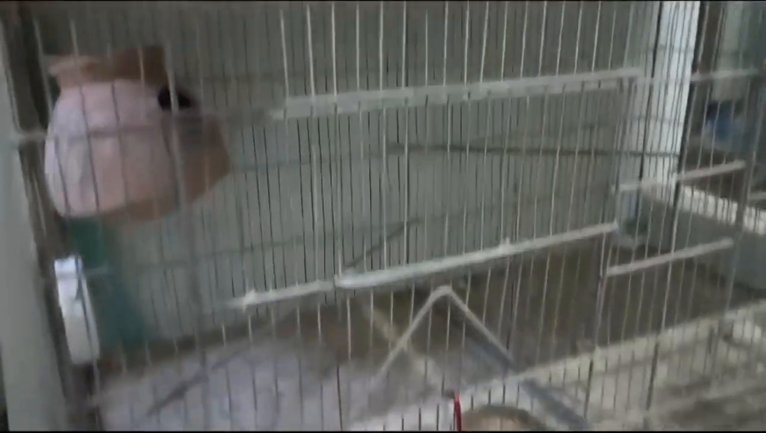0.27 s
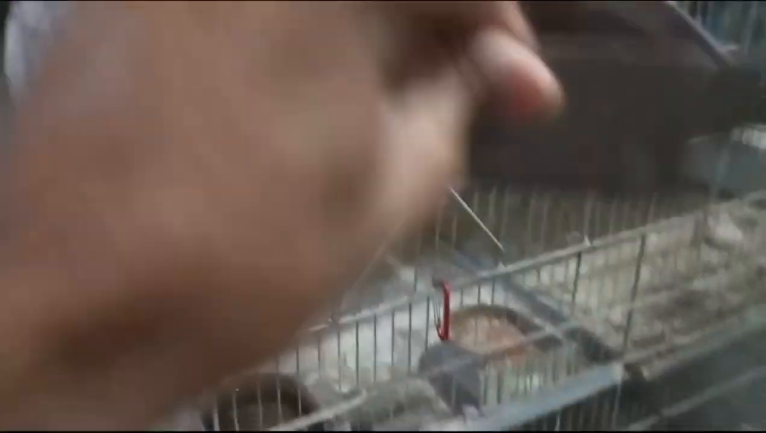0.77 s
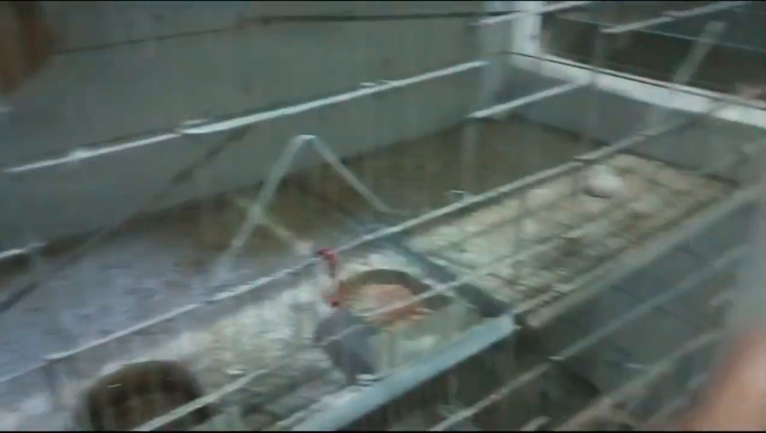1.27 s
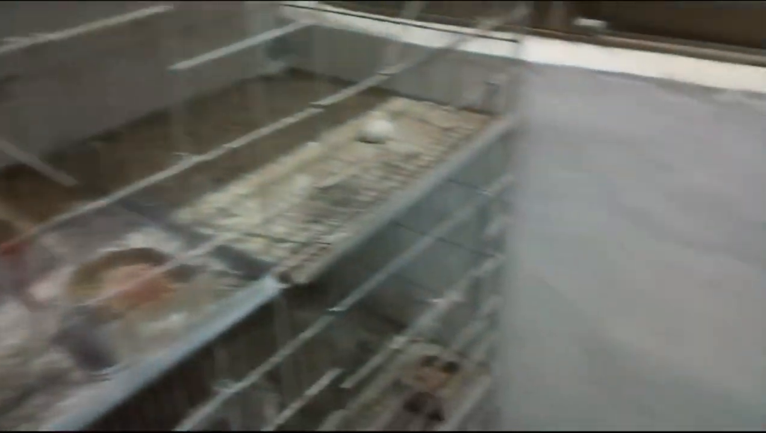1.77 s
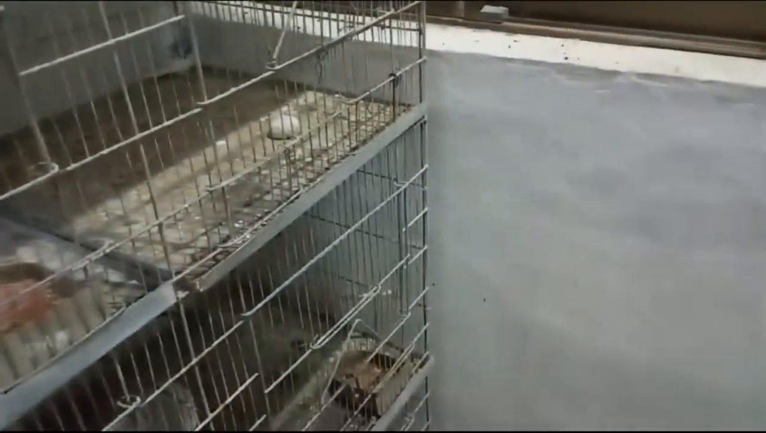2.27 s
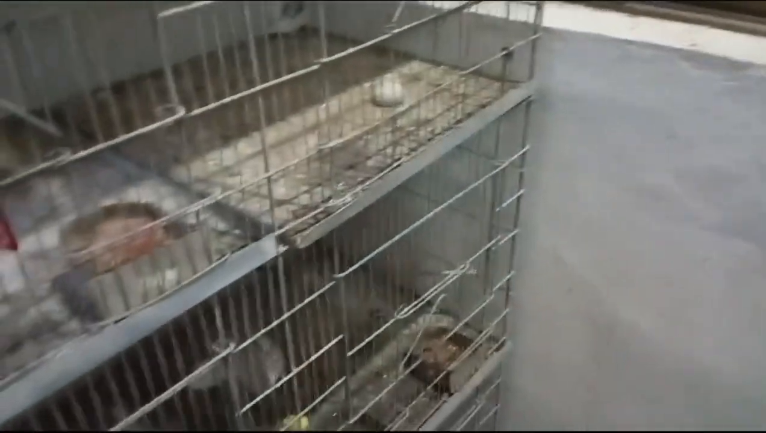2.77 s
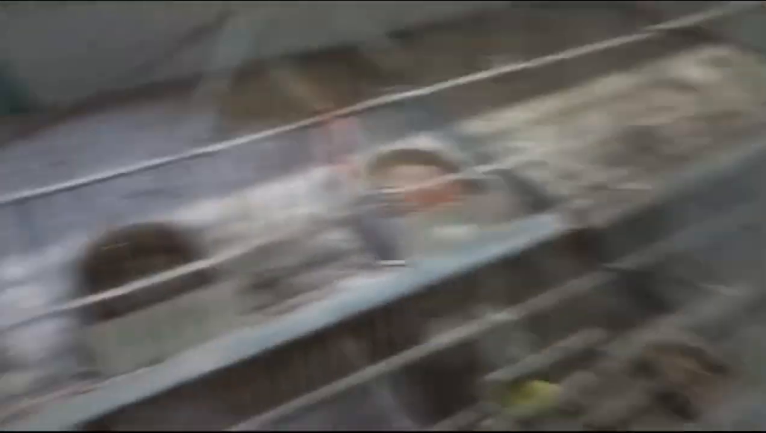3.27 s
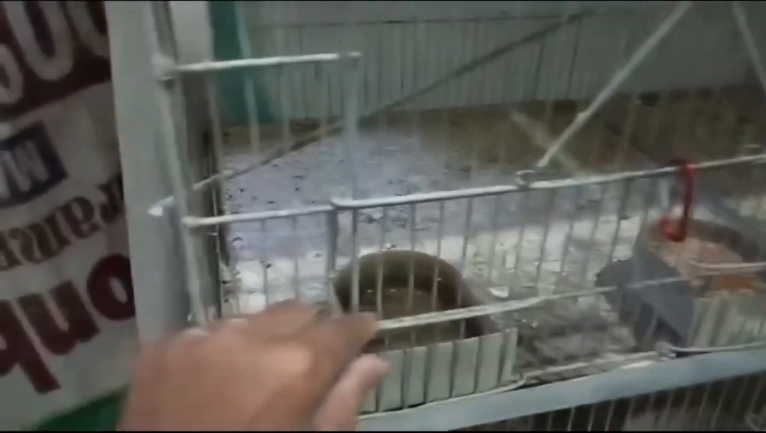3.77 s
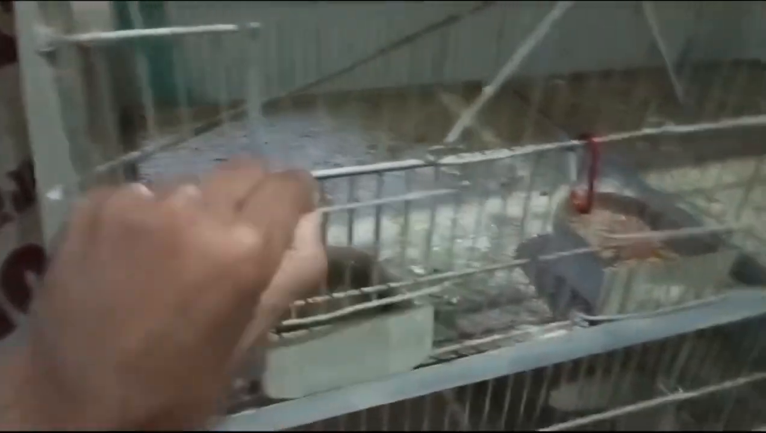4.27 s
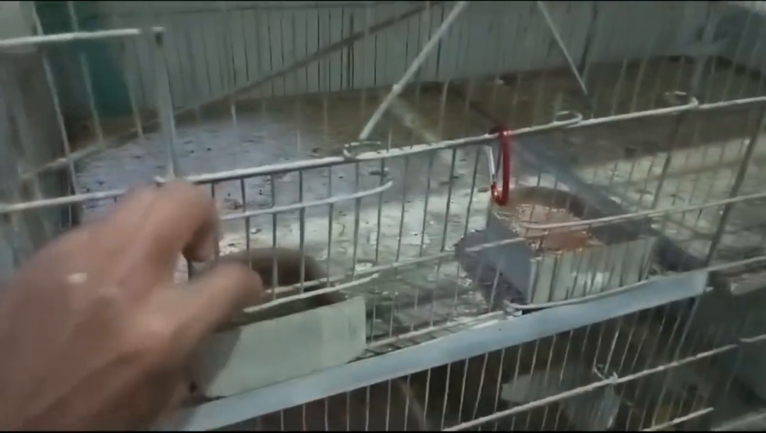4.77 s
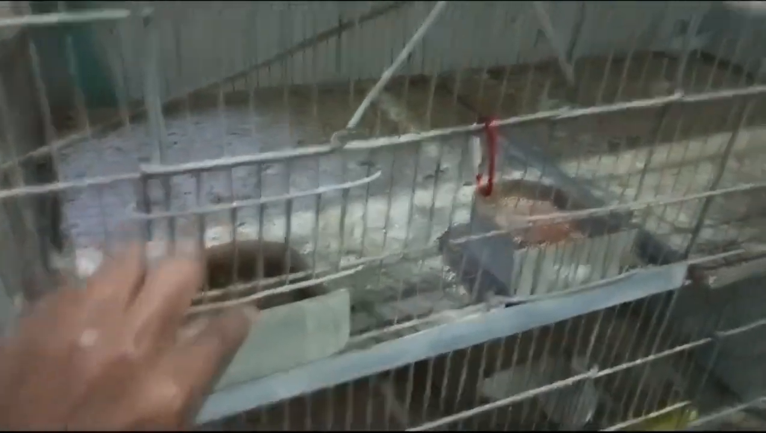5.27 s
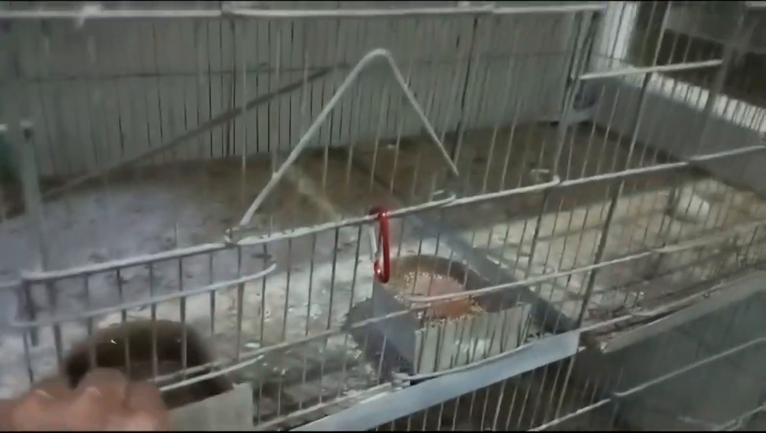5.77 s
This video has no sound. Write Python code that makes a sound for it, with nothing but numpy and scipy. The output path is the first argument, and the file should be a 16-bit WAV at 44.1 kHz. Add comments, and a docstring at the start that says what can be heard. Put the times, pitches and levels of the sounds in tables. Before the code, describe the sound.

Nasal finch calls and scratchy chirps indoors, with one loud squawk, short wing flurries and two rattling jolts of a wire cage.

```python
"""Small cage birds call in a hard-walled room: nasal finch notes, rasps, chirps and one loud, close squawk.
Each call is a harmonic source, the syrinx, shaped by a resonant filter, the throat. Wings whirr in
short flurries; twice the wire cage is jolted, so that impacts set its bars chattering and its tray booming.
Light ticks, a faint high hiss, a hand on the cage and low room noise lie underneath."""
import sys
import numpy as np
from scipy import signal
from scipy.fft import rfft, irfft, next_fast_len
from scipy.io import wavfile
from scipy.ndimage import map_coordinates

SR = 44100
rng = np.random.default_rng(int(sys.argv[2]) if len(sys.argv) > 2 else 0)


def to_wav(sig):
    """Store sig (one row per channel, or 1-D mono) as 16-bit WAV at the path in sys.argv[1].

    Samples outside -1..1 are clipped; the rate is SR.
    """
    pcm = np.clip(np.atleast_2d(sig), -1, 1) * 32767
    pcm = np.round(pcm).astype(np.int16)
    wavfile.write(sys.argv[1], SR, pcm.T)  # frames by channels


N = 264688
BAND_LIMIT_HZ = 15850

# spectrum of the room noise: (frequency [Hz], level [dB])
AIR_SPECTRUM = [(25, -13), (80, 5.5), (220, 0), (370, -2.5), (850, -11), (1600, 1.5), (2200, -7.5),
                (3200, -4.5), (4200, -16.5), (6000, -11), (7800, -24), (10200, -19.5), (16000, -44)]
# the hand shifts the cage: (start [s], duration [s], level [dB])
CAGE_SHIFTS = [(-.15, 0.52, -44.5), (.25, 0.88, -53.5), (3.37, 0.43, -46.5), (4.03, 1.04, -44)]
# spectrum of the handled cage: (frequency [Hz], level [dB])
RUMBLE_SPECTRUM = [(25, -27), (60, -20.5), (100, -5.5), (170, -6), (235, -2), (380, -9.5), (600, -11),
                   (1200, -13), (3000, -44)]
# swells of a faint, high hiss: (start [s], duration [s], level [dB])
HISS_SWELLS = [(-.15, 0.38, -50.5), (.31, 0.061, -41), (.4, 0.16, -34.5), (.72, 0.24, -56),
               (1.6, 0.3, -52.5), (2.57, .12, -55.5), (2.94, 0.064, -53.5), (3.68, 0.054, -56),
               (4, 0.028, -57), (4.5, 0.61, -61), (5.33, 0.068, -49.5), (5.66, 0.18, -46)]
# spectrum of that hiss: (frequency [Hz], level [dB])
HISS_SPECTRUM = [(2000, -32), (3300, -10), (6000, -11), (7800, -18.5), (10300, -2.5), (13000, -18.5),
                 (16000, -20)]
# flurries of wingbeats: (start [s], duration [s], level [dB], beat rate [Hz])
WING_FLURRIES = [(-.06, 0.19, -37, 16.9), (0.12, 0.15, -38.5, 39), (0.427, 0.036, -42, 24),
                 (3.843, 0.15, -43.5, 22.4), (4.083, 0.084, -36.5, 27), (4.169, 0.15, -37, 15.8),
                 (4.566, 0.48, -46, 18), (5.708, 0.23, -52.5, 21)]
# spectrum of swishing feathers: (frequency [Hz], level [dB])
FEATHER_SPECTRUM = [(100, -41), (600, -8.5), (1100, -7), (1750, 6), (2300, -2), (3200, 1.5), (4500, -8),
                    (6000, -8.5), (7800, -23), (10300, -15.5), (16000, -37)]
# spectral envelope common to chirps, rasps and nasal calls: (frequency [Hz], level [dB])
VOICE_SPECTRUM = [(400, -20), (900, 3), (1250, 2.5), (1800, 5.5), (3000, 2), (5500, -3.5), (7600, -24),
                  (10000, -24), (15000, -59)]
# chirps: (start [s], duration [s], pitch [Hz], level [dB], glide [share of pitch], throat resonance [Hz])
CHIRP_NOTES = [(0.305, .046, 1348, -33.5, 0.14, 2600), (0.813, 0.054, 1253, -30.5, 0.093, 4000),
               (0.847, 0.0377, 1244, -21.5, -0.096, 4020), (1.967, .09, 1529, -32, .15, 3340),
               (2.594, .084, 1544, -32.5, -0.14, 3200), (4.504, .05, 1664, -36, -0.014, 3170),
               (4.634, 0.044, 1710, -32, -0.04, 3580), (4.77, 0.081, 1596, -33, .1, 3350),
               (5.133, 0.03, 1660, -36, -0.026, 3000)]
# jolts of the cage: (time [s], chatter level [dB], chatter duration [s], boom level [dB], push centre [Hz])
CAGE_JOLTS = [(.356, -22, 0.19, -28, 363), (0.425, -33, 0.26, -38, 281), (4.25, -24.5, 0.23, -32.5, 238),
              (4.297, -29, 0.067, -32.5, 230), (4.551, -36.5, 0.14, -45.5, 124)]
# spectrum of colliding wires, also used for the squawk's rasp: (frequency [Hz], level [dB])
CHATTER_SPECTRUM = [(100, -27), (500, -8), (900, -3), (1600, 0), (2400, 0.5), (3500, -1), (4600, -5),
                    (6000, -1.5), (7800, -12.5), (10300, -2.5), (13000, -12.5), (16000, -19)]
# modes of the wire bars: (frequency [Hz], bandwidth [Hz], level [dB])
BAR_MODES = [(1421, 26, -0.5), (1576, 220, -6), (1850, 50, -2), (1980, 33, -35), (2845, 51, -16),
             (3500, 18, -7)]
# modes of the sheet-metal tray: (frequency [Hz], 60 dB decay time [s], level [dB])
TRAY_MODES = [(100.8, 0.75, 1), (129.1, 1, -2.5), (192.3, 1, -7), (240.4, 0.53, 3.5), (321, 0.34, 4),
              (380, 0.54, 2), (417.2, 0.37, 1)]
# harsh, hardly pitched calls: (start [s], duration [s], level [dB])
RASP_NOTES = [(0.718, 0.093, -30.5), (1.336, 0.083, -31.5), (1.544, 0.081, -39.5), (1.783, 0.058, -41.5),
              (1.834, 0.05, -33.5), (2.152, 0.087, -44.5), (2.461, 0.043, -33.5), (4.952, 0.074, -46.5),
              (5.263, .04, -32.5), (5.395, 0.082, -32)]
# claws and fingers touch the wires: (time [s], level [dB])
WIRE_TICKS = [(.998, -36.5), (3.443, -31), (3.633, -40.5), (3.79, -75), (4.097, -36), (4.435, -28),
              (4.786, -35), (5.809, -33.5)]
# nasal calls: (start [s], duration [s], pitch [Hz], level [dB], glide [share of pitch])
NASAL_NOTES = [(1.076, 0.041, 847, -37, 0.012), (1.496, 0.094, 603.5, -33.5, 0.033),
               (1.645, 0.1, 641, -34.5, -0.0053), (2.331, 0.054, 809, -41, -0.012),
               (2.414, .034, 720, -41.5, -0.044), (2.644, 0.087, 561, -37, -0.044),
               (2.78, 0.062, 582, -45.5, -0.068), (3.44, 0.0775, 618, -31, 0.02),
               (4.681, 0.066, 555, -38, -.03), (5.213, 0.036, 836, -39.5, 0.026),
               (5.345, 0.059, 595, -32, 0.048), (5.513, 0.13, 604, -34.5, -0.027),
               (5.902, .058, 909, -44.5, 0.049)]
# the squawk, overlapping notes from the syrinx's two sides: (start [s], duration [s], pitch [Hz], level [dB])
SYRINX_NOTES = [(1.139, 0.018, 4030, -29.5), (1.148, 0.034, 3275, -18), (1.175, 0.02, 3200, -15),
                (1.178, 0.0097, 1800, -18.5), (1.191, 0.0072, 2610, -18), (1.204, 0.0177, 3667, -10.5),
                (1.199, 0.0192, 2632, -11.5), (1.218, 0.035, 2940, -10.5), (1.221, 0.028, 3450, -16)]
# tiny dry clicks: (time [s], level [dB])
HIGH_CLICKS = [(2.494, -53), (2.528, -37)]
# a hand brushes the tray: (start [s], duration [s], level [dB])
TRAY_BRUSHES = [(3.383, 0.11, -43), (3.534, 0.27, -70), (5.892, 0.12, -50)]
# reverberation of the room: (frequency [Hz], 60 dB decay time [s])
ROOM_DECAY = [(150, 0.76), (1000, 0.61), (3000, 0.42), (7000, 0.35), (14000, 0.063)]


def amp(db):
    """Amplitude ratio of a level in decibels."""
    return 10 ** (np.asarray(db) / 20)


def unit(x):
    """Normalisation to an rms of 1."""
    return x / np.sqrt(np.mean(x ** 2) + 1e-20)


def along(points, hz):
    """Interpolation of (frequency, value) points on a logarithmic frequency axis."""
    freqs, values = np.transpose(points)
    return np.interp(np.log(hz + 1), np.log(freqs + 1), values)


def clock(length):
    """Sample times over a length in seconds."""
    return np.arange(int(length * SR)) / SR


def wobble(rate, t):
    """Smooth random modulation: a spline through `rate` Gaussian values a second."""
    return map_coordinates(rng.standard_normal(8192), [t * rate + 2], mode='wrap')


def add(track, start, x):
    """Superposition of x on the track, from a start in seconds."""
    i = round(start * SR)
    x = x[max(-i, 0):max(N - i, 0)]
    track[max(i, 0):][:len(x)] += x


def filtered(x, response):
    """Linear filtering: the spectrum of x times a frequency response."""
    size = next_fast_len(len(x) + 8192)
    return irfft(rfft(x, size) * response(np.fft.rfftfreq(size, 1 / SR)), size)[:len(x)]


def coloured(x, spectrum):
    """Spectral shaping of x, at an rms of 1."""
    return unit(filtered(x, lambda hz: amp(along(spectrum, hz))))


def ringing(t, modes):
    """Forced resonance: noise drives damped modes of alternating polarity, at an rms of 1."""
    def response(hz):
        return sum((-1) ** k * amp(db) * 1j * hz * width / (centre ** 2 - hz ** 2 + 1j * hz * width)
                   for k, (centre, width, db) in enumerate(modes))
    return unit(filtered(rng.standard_normal(len(t)), response))


def swell(t, edge):
    """A raised-cosine envelope; rise and fall each take the share `edge` of its length."""
    progress = t / t[-1]
    return np.sin(np.pi / 2 * np.clip(np.minimum(progress, 1 - progress) / edge, 0, 1)) ** 2


def swells(rows, edge, rest_db):
    """An envelope that rests low and swells once for each (start, duration, level) row."""
    gain = np.full(N, amp(rest_db))
    for start, length, db in rows:
        add(gain, start, amp(db) * swell(clock(length), edge))
    return gain


def grainy_noise(t, spiky_db):
    """Noise under fast random amplitude modulation, which gives it an uneven grain."""
    return rng.standard_normal(len(t)) * amp(spiky_db * wobble(600, t))


def air(level_db=-53):
    """Stationary noise: the low, steady background of the room."""
    return amp(level_db) * coloured(rng.standard_normal(N), AIR_SPECTRUM)


def cage_rumble(level_db=-3):
    """Structure-borne noise: the cage rumbles softly as the hand shifts it."""
    handling = amp(level_db) * swells(CAGE_SHIFTS, edge=0.33, rest_db=-54)
    return handling * coloured(rng.standard_normal(N), RUMBLE_SPECTRUM)


def high_hiss(level_db=-1):
    """Modulated noise: a faint, fine, high hiss that swells and fades."""
    t = np.arange(N) / SR
    envelope = swells(HISS_SWELLS, edge=0.44, rest_db=-64.5) * amp(level_db + 0.23 * wobble(25, t))
    return envelope * coloured(grainy_noise(t, spiky_db=1), HISS_SPECTRUM)


def wings(stroke_db=4, level_db=-1.5):
    """Amplitude modulation: each downstroke swishes the feathers against the air and the wires."""
    out = np.zeros(N)
    for start, length, db, beat_hz in WING_FLURRIES:
        t = clock(length)
        beat = np.cos(2 * np.pi * beat_hz * t + wobble(23.2, t))
        rustle = coloured(grainy_noise(t, spiky_db=3), FEATHER_SPECTRUM)
        add(out, start, amp(db + level_db) * swell(t, edge=0.17) * unit(rustle * amp(stroke_db * beat)))
    return out


def call(length, pitch_hz, glide, throat_hz, width_hz, rough, edge, arch=0.0769):
    """Source and filter: harmonics pass the throat resonance; an unsteady syrinx and pulsed air rasp."""
    def throat(hz):
        # roughness (0 to 1) raises the resonance peak and tilts the voice towards the treble
        peak_db = (7 + 10 * rough) / (1 + ((hz - throat_hz) / width_hz) ** 2)
        tilt_db = 9 * rough * np.log2(np.clip(hz, 500, 9500) / throat_hz)
        return amp(along(VOICE_SPECTRUM, hz) + peak_db + tilt_db) * (hz < BAND_LIMIT_HZ)

    t = clock(length)
    progress = t / length
    bend = arch * (np.sin(np.pi * progress) - np.sin(np.pi / 3)) + glide * (progress - 0.5)
    jitter = rough * (0.06 * wobble(650, t) + 0.055 * wobble(120, t)) + 0.014 * wobble(70, t)
    pitch = pitch_hz * (1 + bend + jitter)
    phase = 2 * np.pi * np.cumsum(pitch) / SR
    harmonics = np.arange(1, 22)[:, None]
    tone = unit(np.sum(throat(harmonics * pitch) * np.sin(harmonics * phase), axis=0))
    puffs = unit(filtered(rng.standard_normal(len(t)) * (1 + np.cos(phase)), throat))
    shimmer = amp(4 * rough * wobble(300, t))
    return swell(t, edge) * unit((tone + 1.1 * rough * puffs) * shimmer)


def chirps():
    """Irregular oscillation at a high pitch: scratchy chirps, each with its own throat resonance."""
    out = np.zeros(N)
    for start, length, pitch_hz, db, glide, throat_hz in CHIRP_NOTES:
        note = call(length, pitch_hz, glide, throat_hz, width_hz=910, rough=0.638, edge=0.39)
        add(out, start, amp(db) * note)
    return out


def jolts(bars_db=-8, bars_t60=0.78, tray_db=-3, fade_power=1.88):
    """Impact excitation: wire chatter holds briefly, then fades fast; the bars ring and the tray booms."""
    out, t = np.zeros(N), clock(1)
    for start, db, length, boom_db, push_hz in CAGE_JOLTS:
        fade = amp(-60 * (t / length) ** fade_power)
        chatter = coloured(grainy_noise(t, spiky_db=4), CHATTER_SPECTRUM) * fade
        bars = ringing(t, BAR_MODES) * amp(bars_db - 60 * t / bars_t60)
        add(out, start, amp(db) * (chatter + bars) + amp(boom_db + tray_db) * tray(t, push_hz))
    return out


def tray(t, push_hz, rise_s=0.019, falloff_db=5):
    """Modal decay: a push favours the modes near its frequency; the loose wires shake their phases."""
    ring = np.zeros(len(t))
    for hz, t60, db in TRAY_MODES:
        octaves_off = np.log2(hz / push_hz)
        decay = amp(db - falloff_db * octaves_off ** 2 - 60 * t / t60)
        ring += decay * np.sin(2 * np.pi * hz * t + wobble(36.4, t))
    early_rms = np.sqrt(np.mean(ring[:SR // 10] ** 2))
    return ring / early_rms * (1 - np.exp(-(t / rise_s) ** 2))


def rasps(pitch_hz=857, glide=-0.0322, thinning_hz_per_db=137):
    """Strong jitter blurs the pitch; a softer rasp has a higher throat resonance and sounds thinner."""
    out = np.zeros(N)
    loudest_db = max(note[-1] for note in RASP_NOTES)
    for start, length, db in RASP_NOTES:
        throat_hz = 3270 + thinning_hz_per_db * (loudest_db - db)
        note = call(length, pitch_hz, glide, throat_hz, width_hz=960, rough=0.77, edge=0.46)
        add(out, start, amp(db) * note)
    return out


def ticks(level_db=-7, t60=0.15):
    """Light impacts of claws and fingers on the wires give bursts of noise that decay exponentially."""
    out, t = np.zeros(N), clock(1)
    for start, db in WIRE_TICKS:
        touch = coloured(grainy_noise(t, spiky_db=-0.5), CHATTER_SPECTRUM)
        add(out, start, touch * amp(db + level_db - 60 * t / t60))
    return out


def nasal_calls():
    """Nearly periodic oscillation of the syrinx gives a clean, nasal harmonic series."""
    out = np.zeros(N)
    for start, length, pitch_hz, db, glide in NASAL_NOTES:
        note = call(length, pitch_hz, glide, throat_hz=3220, width_hz=600, rough=0.26, edge=0.3)
        add(out, start, amp(db) * note)
    return out


def squawk(sag_hz_per_s=7300, fade_db_per_s=70, buzz_hz=850, buzz_depth=0.22,
           harmonics_db=(0, -31, -35, -40)):
    """Biphonation: both sides of the syrinx whistle at once, leaping in pitch, buzzing and beating."""
    out = np.zeros(N)
    loudest_db = max(note[-1] for note in SYRINX_NOTES)
    for start, length, pitch_hz, db in SYRINX_NOTES:
        t = clock(length)
        from_middle = t - length / 2
        pitch = (pitch_hz - sag_hz_per_s * from_middle) * (1 + 0.045 * wobble(550, t))
        phase = 2 * np.pi * np.cumsum(pitch) / SR
        tone = sum(amp(level) * np.sin(k * phase) for k, level in enumerate(harmonics_db, 1))
        force = amp(db - fade_db_per_s * from_middle) * swell(t, edge=0.14)
        depth = buzz_depth * force / amp(loudest_db)  # the buzz grows with the force of the cry
        buzz = 1 + depth * np.sin(2 * np.pi * buzz_hz * t + 2 * wobble(216, t))
        rasp = amp(-30) * coloured(rng.standard_normal(len(t)), CHATTER_SPECTRUM)
        shimmer = amp(1.2 * wobble(350, t))
        add(out, start, force * shimmer * (unit(tone * buzz) + rasp))
    return out


def clicks(ring_hz=11400, width_hz=1500, t60=0.012):
    """Rapid decay of noise in one very high resonance is heard as a tiny, dry, close click."""
    out, t = np.zeros(N), clock(2 * t60)
    for start, db in HIGH_CLICKS:
        add(out, start, ringing(t, [(ring_hz, width_hz, 0)]) * amp(db - 60 * t / t60))
    return out


def brushes(centre_hz=900, width_hz=700):
    """Sliding friction: skin on the tray makes a dull, broad band of noise."""
    out = np.zeros(N)
    for start, length, db in TRAY_BRUSHES:
        t = clock(length)
        add(out, start, amp(db) * swell(t, edge=0.17) * ringing(t, [(centre_hz, width_hz, 0)]))
    return out


def room(x, near_db, tail_db, near_t60=0.15, bass_cut_hz=500, delay_samples=90):
    """Reverberation: direct sound, bass-poor early reflections from small surfaces, and the room's tail."""
    hz, t, noise = signal.stft(rng.standard_normal(SR), SR, nperseg=256)
    decay = amp(-60 * t / along(ROOM_DECAY, hz)[:, None])
    tail = signal.istft(noise * decay, SR, nperseg=256)[1]
    near = filtered(rng.standard_normal(len(tail)), lambda f: f ** 2 / (f ** 2 + bass_cut_hz ** 2))
    near *= amp(-60 * np.arange(len(tail)) / SR / near_t60)
    reflections = amp(near_db) * near / np.linalg.norm(near) + amp(tail_db) * tail / np.linalg.norm(tail)
    return x + signal.fftconvolve(x, np.pad(reflections, (delay_samples, 0)))[:N]


def scene(flock_db=-3, squawk_db=-6.5, cage_db=-2):
    """Superposition of all sources; the ratio of direct to reflected sound conveys their distance."""
    flock = amp(flock_db) * room(chirps() + rasps() + nasal_calls(), near_db=-2, tail_db=-4.5)
    close_bird = amp(squawk_db) * room(squawk(), near_db=-3.5, tail_db=-10)
    cage = amp(cage_db) * room(wings() + jolts() + ticks(), near_db=-5.5, tail_db=-4.5)
    return (air() + cage_rumble() + high_hiss() + flock + cage + close_bird + clicks() + brushes())[None]


def record(dry):
    """An ideal low-pass filter removes everything above the band limit."""
    return filtered(dry[0], lambda hz: hz < BAND_LIMIT_HZ)[None]


dry = scene()
out = record(dry)
to_wav(out)
```